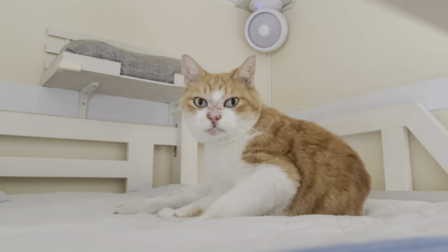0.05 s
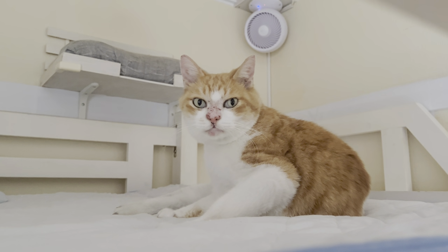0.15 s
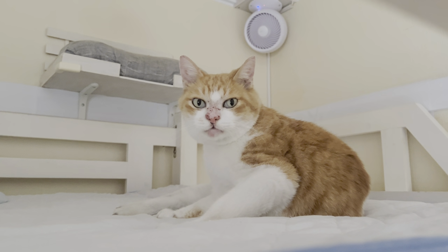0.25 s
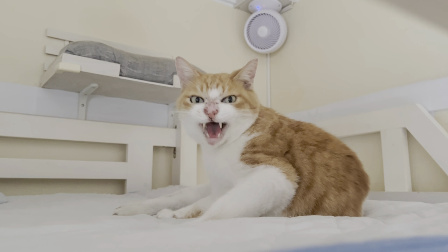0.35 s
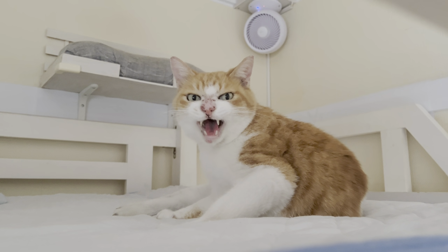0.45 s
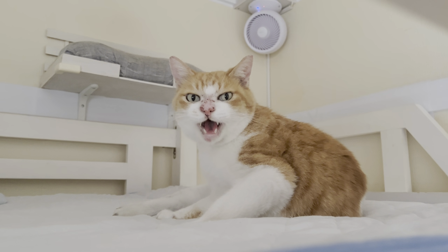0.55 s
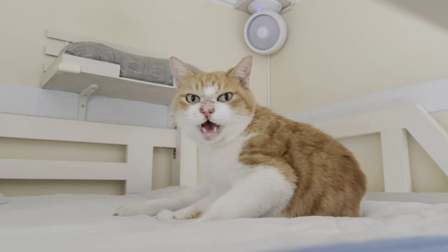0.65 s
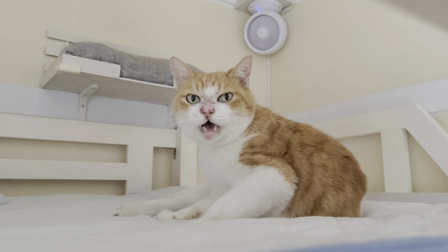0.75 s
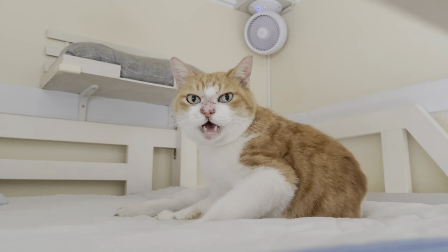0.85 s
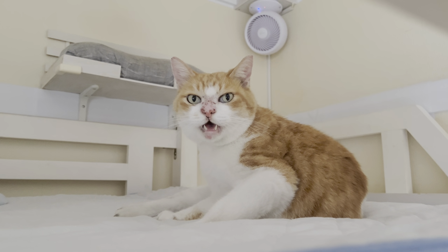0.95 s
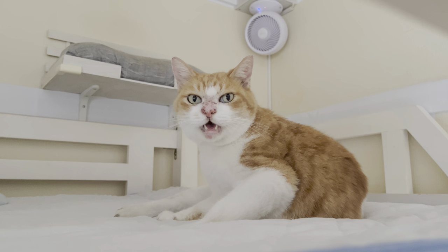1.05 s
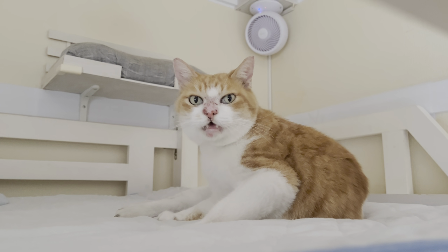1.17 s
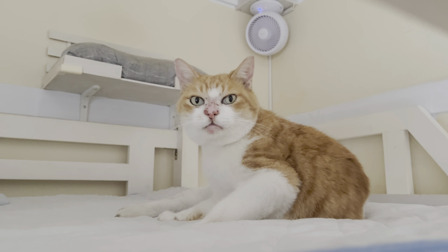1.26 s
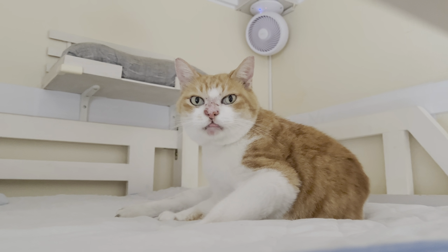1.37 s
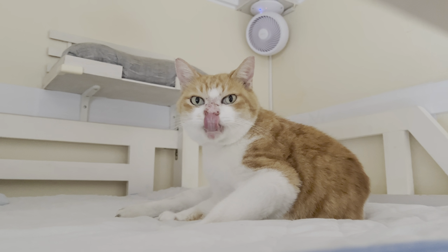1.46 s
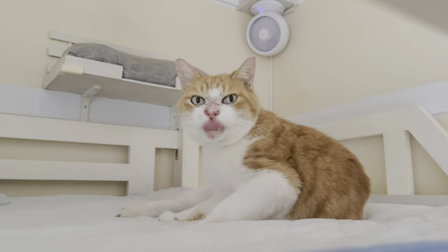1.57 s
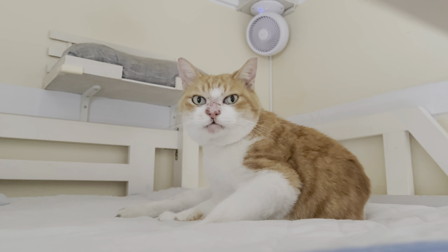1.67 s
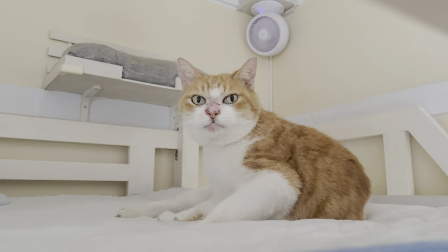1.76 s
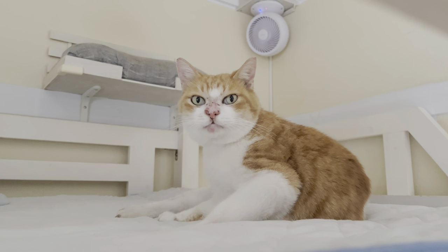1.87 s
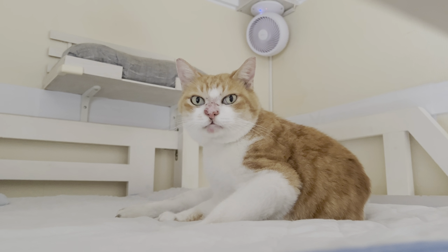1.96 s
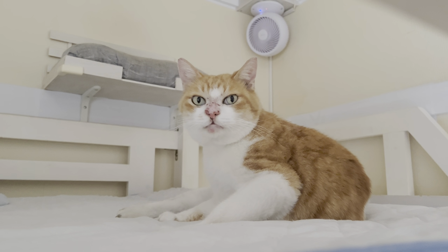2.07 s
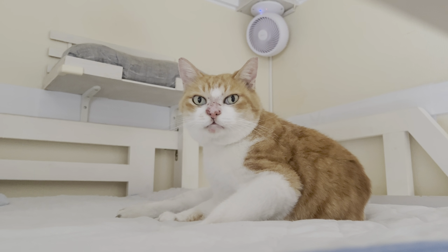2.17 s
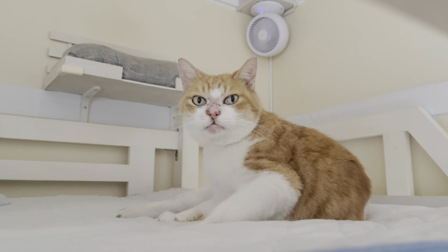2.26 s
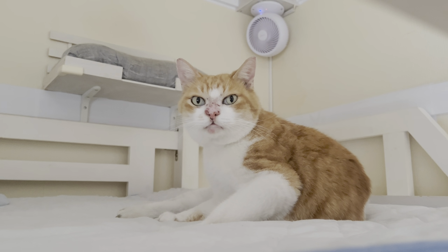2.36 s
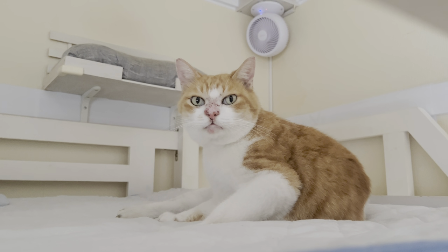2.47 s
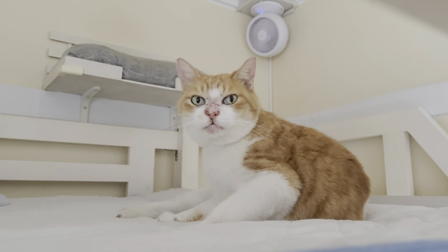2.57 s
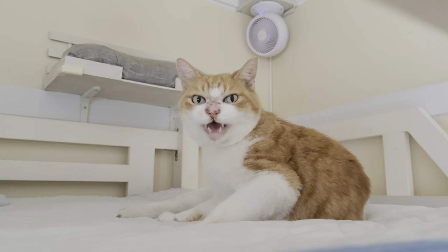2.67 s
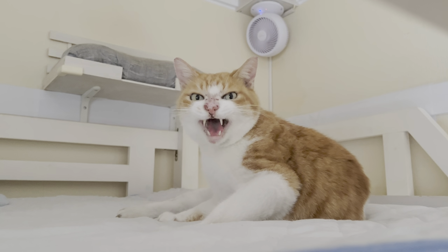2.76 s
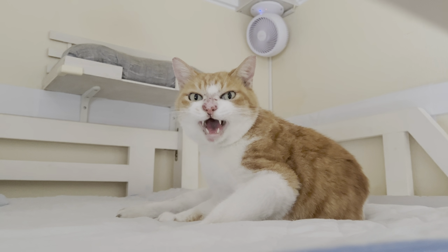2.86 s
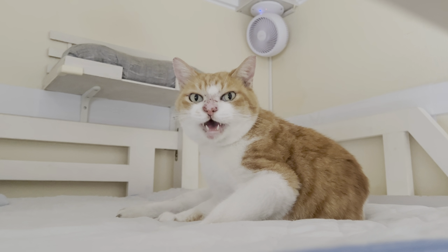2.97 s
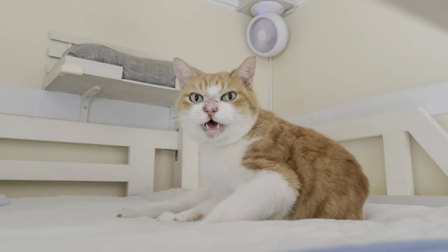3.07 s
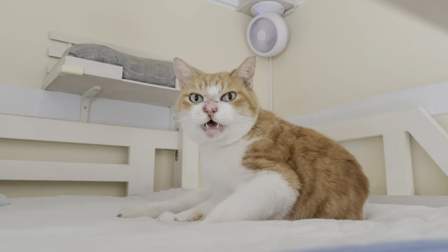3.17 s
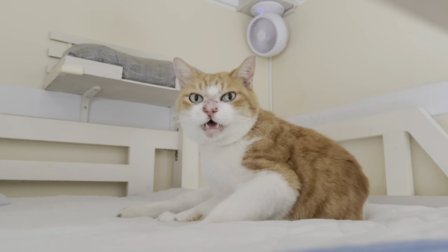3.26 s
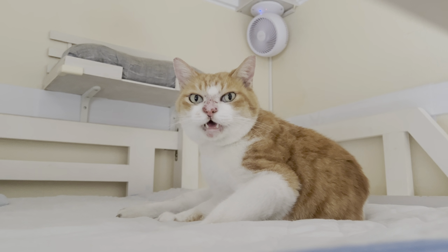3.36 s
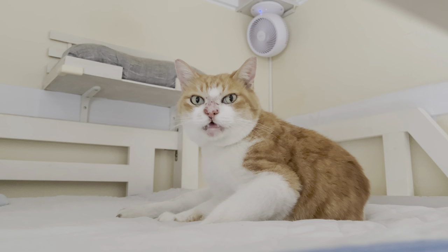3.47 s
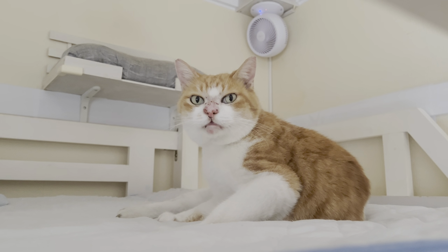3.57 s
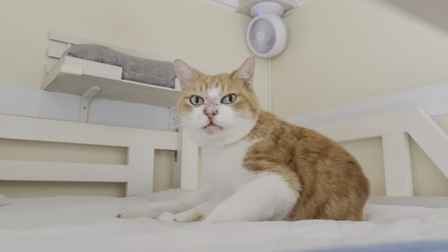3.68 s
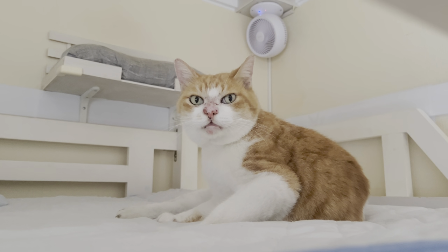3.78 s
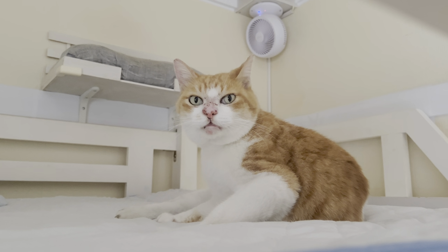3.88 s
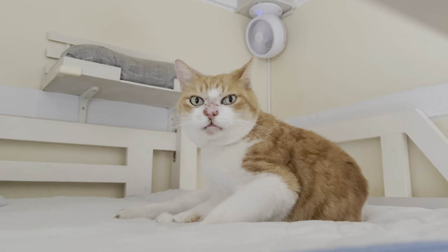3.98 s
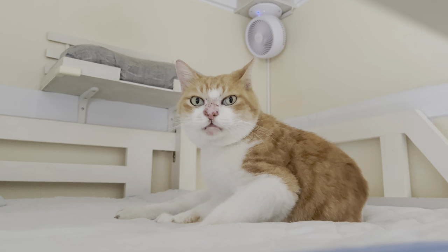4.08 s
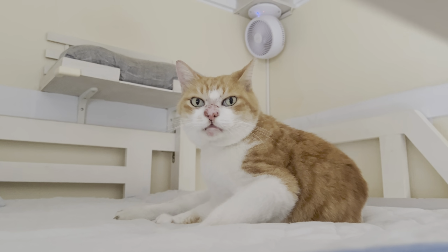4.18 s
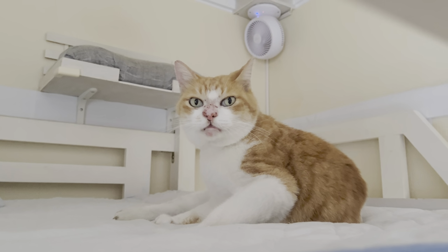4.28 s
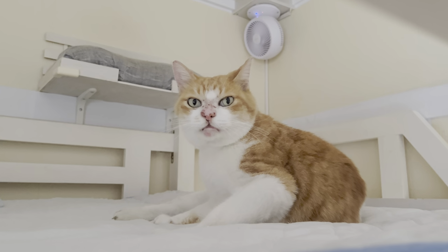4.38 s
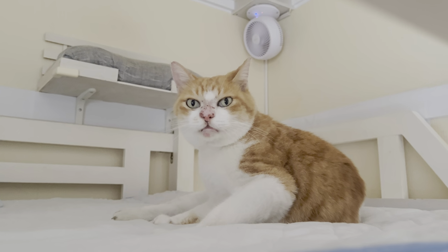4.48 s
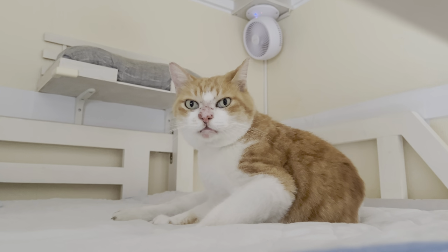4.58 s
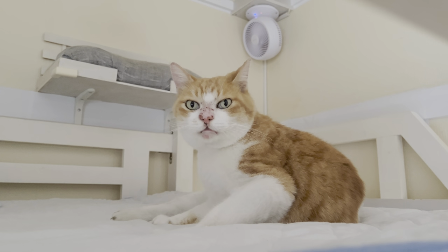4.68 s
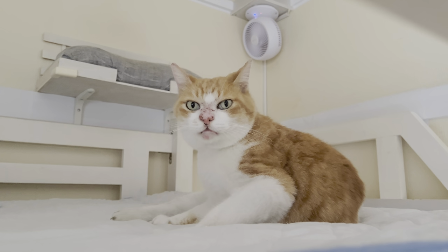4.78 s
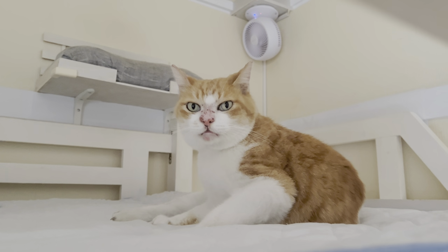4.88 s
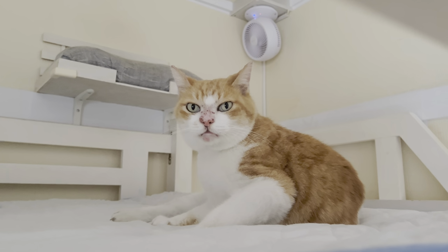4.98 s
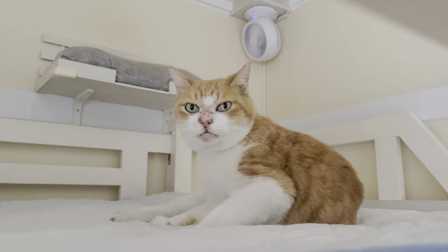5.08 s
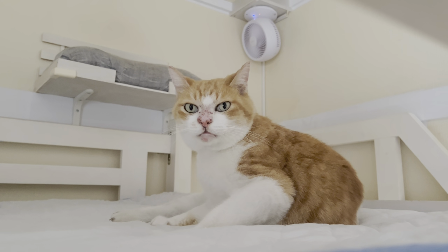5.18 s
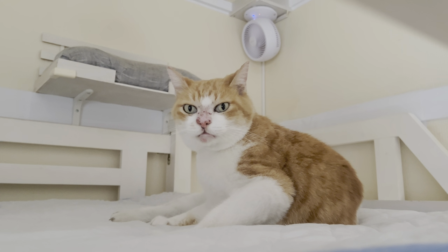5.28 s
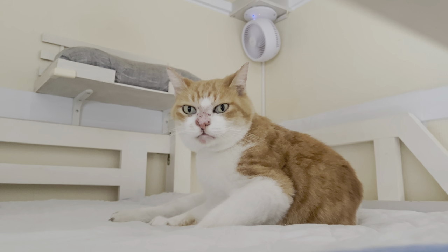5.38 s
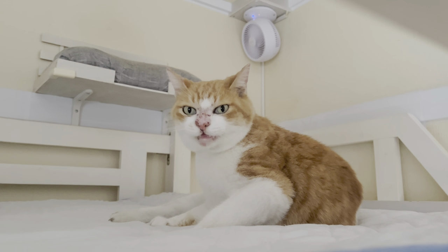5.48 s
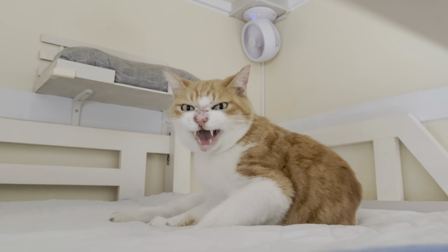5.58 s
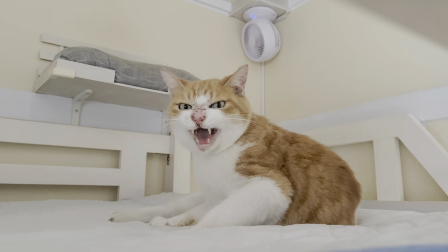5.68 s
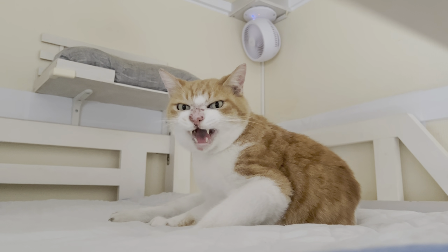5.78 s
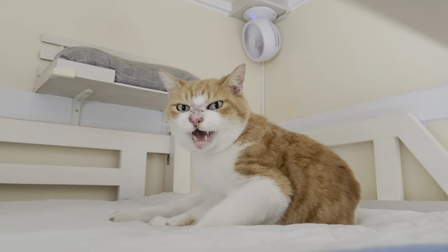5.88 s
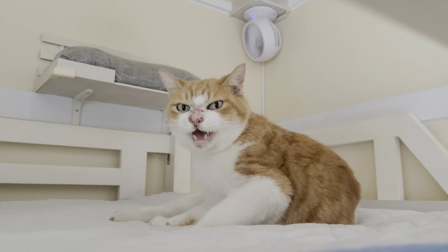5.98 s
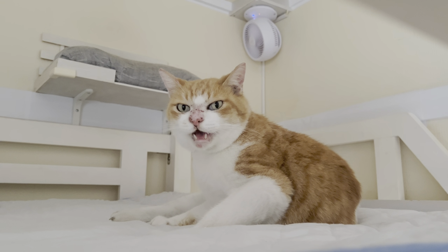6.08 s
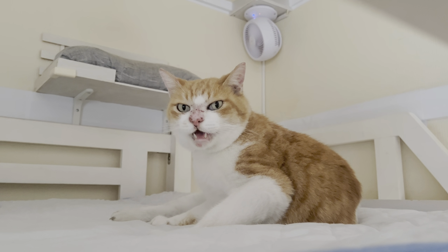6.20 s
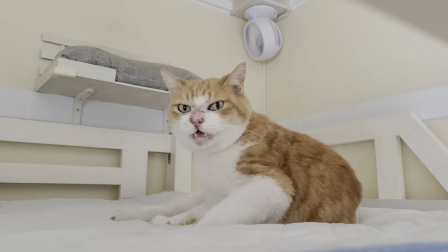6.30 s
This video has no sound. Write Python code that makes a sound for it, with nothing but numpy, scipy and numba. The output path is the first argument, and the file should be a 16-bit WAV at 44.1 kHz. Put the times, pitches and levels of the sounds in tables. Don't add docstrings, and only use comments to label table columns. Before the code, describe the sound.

Three rough, cracked cat calls, spaced about two seconds apart, close up indoors, with faint cloth rustle and a low fan whir.

```python
import sys
import numpy as np
from scipy import signal
from scipy.fft import rfft, irfft
from scipy.io import wavfile
from scipy.ndimage import uniform_filter1d
from numba import njit

SR = 44100
rng = np.random.default_rng(int(sys.argv[2]) if len(sys.argv) > 2 else 0)


def waveform_to_disk(signal):
    frames = np.transpose(np.atleast_2d(signal))
    scaled = np.clip(frames, -1, 1) * 32767
    samples = np.round(scaled).astype(np.int16)
    wavfile.write(sys.argv[1], SR, samples)


def amplitude_ratio(level_db):
    exponent = np.asarray(level_db, float) / 20
    return 10 ** exponent


N = 279622
TIME = np.arange(N) / SR
HZ = np.arange(N // 2 + 1) * SR / N

# (frequency [Hz], density [dB per Hz])
FAN_MID = [(15, -28), (25, -38), (48, -4.5), (86, -5.5), (128, 0), (152, -9), (264, -3), (300, -11),
           (333, -8.5), (363, -11), (732, -11.5), (944, -18), (1410, -23), (4000, -42), (5200, -100),
           (8800, -120)]
FAN_SIDE = [(15, -27), (25, 0), (58, -11.5), (108, -11), (264, -18.5), (300, -13.5), (333, -17.5),
            (371, -27.5), (510, -17), (831, -20.5), (1050, -29), (1610, -25.5), (2030, -35.5), (4000, -48),
            (5200, -56.5), (8800, -120)]
FAN_MID_DB, FAN_SIDE_DB = -50, -51
# (frequency [Hz], density [dB per Hz])
HISS_MID = [(2350, -32), (4000, -15), (4390, -8), (5180, 1), (5810, -0.5), (7530, -15), (9530, -25),
            (11300, -18.5), (11900, -21), (12800, -43.5), (13800, -19.5), (15100, -14), (15800, -27.5)]
HISS_SIDE = [(2350, -35.5), (4000, -19), (4240, -5), (4750, -13.5), (5610, 3), (6520, -9.5), (7480, -11.5),
             (9100, -27.5), (10300, -26), (11600, -14.5), (14200, -18.5), (15500, -17), (15800, -56)]
HISS_MID_DB, HISS_SIDE_DB = -67.5, -67.5
# (frequency [Hz], in phase [ratio], a quarter turn ahead [ratio])
PORT_SHARE = [(60, -0.21, -0.19), (130, -0.43, 0.45), (234, -0.37, 0.45), (460, -0.17, 0.72),
              (804, 0.46, 0.6), (1300, 0.27, -0.3), (1700, 0.12, 0.15), (2300, -0.42, -0.34),
              (3300, 0.0, 0.047), (4700, 0.66, 0.06), (6000, 0.16, -0.0012), (7250, 0.42, 0.073),
              (9000, -0.72, 0.01), (13000, -0.11, 0.21)]

# (time [s], level [dB])
EFFORT = [
    [(.322, -75), (.334, -42), (.362, -46.5), (.371, -38), (.43, -36), (.56, -36.5), (.85, -37.5),
     (1.06, -38.5), (1.2, -81.5)],
    [(2.69, -88), (2.702, -46), (2.77, -36.5), (2.84, -33), (2.865, -39), (3.08, -40.5), (3.335, -40.5),
     (3.365, -64), (3.46, -72)],
    [(5.478, -66), (5.534, -58), (5.564, -44), (5.61, -46), (5.638, -35), (5.86, -38.5), (6.1, -40),
     (6.2, -38.5), (6.335, -79)],
]
# (time [s], closure [-1 lips just parting, 0 wide open, 1 nearly closed, 2 shut])
JAW = [
    [(.33, -0.22), (.37, -0.12), (.43, -0.01), (.54, 0.19), (.6, 0.59), (.72, 1.06), (1.0, 1.06),
     (1.085, 1.63), (1.2, 1.68)],
    [(2.69, -0.17), (2.84, 0.069), (2.9, 0.5), (2.97, 0.84), (3.25, 0.9), (3.33, 1.66), (3.37, 1.55),
     (3.46, 1.68)],
    [(5.47, -1), (5.56, -0.47), (5.6, -0.13), (5.76, .1), (5.87, 0.4), (6.02, 0.58), (6.12, 0.79),
     (6.235, 1.565), (6.34, 1.8)],
]
# (time [s], first pitch [Hz], last pitch [Hz], roughness [0-1], weakness of every second pulse [0-1])
REGISTERS = [(.32, 955, 1010, .04, 0), (.366, 1000, 975, .45, .3), (.388, 362, 368.4, .27, 0),
             (.445, 284.3, 284.7, .4, .25), (.585, 284.7, 280, .23, .05), (.66, 279.5, 274, .31, .15),
             (.775, 280.5, 277.5, .17, 0), (.895, 272, 258, .36, .2), (1.015, 396, 384, .35, .3),
             (2.69, 160.3, 152, .58, .3), (2.805, 197.6, 199, .25, .4), (2.87, 270.8, 270.2, .55, .1),
             (2.96, 270.2, 265.3, .48, .2), (3.292, 372, 350, .28, .05), (5.47, 410, 400, .45, 0),
             (5.538, 566, 562, .14, .05), (5.576, 668, 652, .22, .25), (5.63, 652.3, 594, .17, .1),
             (5.69, 289, 273, .36, .3), (5.8, 272, 261, .19, 0), (6.02, 261.5, 250, .24, 0),
             (6.115, 422, 378, .36, .25), (6.21, 388, 362, .38, .1)]
VOICE_ENDS_S = [1.115, 3.37, 6.265]
# (time of a burst [s], rate [Hz], depth [dB], spread [s])
STUTTERS = [
    (1.048, 24.9, 2.5, .05),
    (3.342, 29, 6.5, 0.039),
    (6.2, 22, -2.5, 0.053),
]
# (closure, mouth [Hz], teeth [Hz])
TRACT = [(-1, 860, 5500), (-0.027, 2780, 5510), (0.27, 1940, 6030), (0.74, 1700, 7530), (1, 1566, 7700),
         (1.295, 1275, 7700), (1.69, 1087, 9450), (1.6, 1700, 8200)]
# (closure, chest [dB], palate [dB], teeth [dB])
BALANCE_DB = [(-1, 12, -3.5, 0), (-0.127, -4, -4.5, -9), (-0.064, -12.5, -11, -10.5),
              (0.236, -8.5, 0.5, -17.5), (1.09, -4, -7, -22.5), (1.43, -0.5, -6, -18), (1.82, 2, 2, -8),
              (1.65, -5, 6, -12)]
# (frequency [Hz], gain [dB])
BED = [(150, -3), (380, 13.5), (560, 5), (820, -3.5), (1080, -1.5), (1400, 6.5), (1700, 6.5), (1950, -3),
       (2240, 4), (2400, -5.5), (2570, -2), (3000, 1.5), (3350, -1), (4600, -2.5)]

# (time [s], peak [dB], ring [Hz], decay [ms], left minus right [dB])
TICKS = [(1.106, -53, 12000, .4, -0.5), (1.343, -55, 11500, .15, 5), (1.545, -52, 11400, .15, 2),
         (2.602, -53, 14700, 0.22, 5), (2.606, -45, 880, 11, -2), (2.627, -51, 7370, 0.87, -1),
         (2.635, -48, 7500, 0.46, -4), (2.661, -54, 2800, 0.91, 0), (2.666, -56, 3001, 0.79, 0),
         (4.578, -49.5, 1300, 4, 8), (5.014, -39.5, 65, 23, 6), (5.488, -53, 8000, 0.35, -5),
         (5.542, -47, 5530, 1.9, 9), (1.653, -43, 58, 38, -10), (.371, -48, 2900, 2, -2),
         (2.704, -35, 2740, 1.8, 0), (5.485, -44, 851, 7.8, -5.5), (2.612, -40.5, 328, 20, -1)]
# (time [s], spread [s], level [dB])
SIGHS = [
    (1.11, 0.018, -61),
    (3.363, 0.019, -60),
    (6.27, 0.036, -71),
]
# (time [s], level [dB], rise [s], fall [s])
RUSTLE = [
    (1.618, -64.5, 0.14, 0.11),
    (2.661, -55, 0.15, 0.032),
    (3.51, -54, 0.063, 0.34),
    (3.77, -68, 0.18, 0.077),
    (4.566, -60, .01, 0.2),
    (4.5, -67, 0.092, .08),
]
# (frequency [Hz], density [dB per Hz])
CLOTH = [(300, -30), (900, 3.5), (1500, 11.5), (3000, 3), (4500, 1.5), (7000, -30), (10000, -39)]

# (frequency [Hz], left minus right [dB])
LEFT_DB = [(300, 2.5), (550, -2), (800, 15.5), (1300, 10), (1700, 6.5), (2000, -5), (2600, 1), (3800, 1),
           (4800, 9.5), (6200, -7.5), (7100, 9), (9000, -12.5), (10500, 8.5)]
# (frequency [Hz], phase [radians])
LEFT_LEAD = [(0, 0), (300, .5), (800, 1.0), (1250, .6), (1700, 3.0), (2050, 4.8), (2500, 6.3), (3300, 7.0),
             (4000, 9.0), (5200, 7.3), (6300, 9.5), (7400, 7.8), (10000, 6.3), (12000, 3.2), (13700, 3.1),
             (15300, 0)]


def at_hz(table, col=1):
    t = np.array(table, float)
    return np.interp(np.log(HZ + 1), np.log(t[:, 0] + 1), t[:, col])


def at_time(table):
    s, *columns = np.transpose(table)
    return [np.interp(TIME, s, c) for c in columns]


def colour(x, table):
    return irfft(rfft(x) * amplitude_ratio(at_hz(table)), N)


def level(x, db):
    return x * amplitude_ratio(db) / np.sqrt(np.mean(x ** 2))


def bump(s, spread):
    return np.exp(-.5 * ((TIME - s) / spread) ** 2)


def walk(rate_hz):
    k = int(SR / rate_hz)
    held = np.repeat(rng.standard_normal(N // k + 1), k)
    return 1.3 * uniform_filter1d(uniform_filter1d(held, k), k)[:N]


def fan():
    share = at_hz(PORT_SHARE) + 1j * at_hz(PORT_SHARE, col=2)
    out = 0
    for mid, mid_db, side, side_db, swell_db in (
            (FAN_MID, FAN_MID_DB, FAN_SIDE, FAN_SIDE_DB, .8),
            (HISS_MID, HISS_MID_DB, HISS_SIDE, HISS_SIDE_DB, .4)):
        a, b = rfft(rng.standard_normal((2, N)))
        b = share * a + np.sqrt(np.clip(1 - abs(share) ** 2, 0, 1)) * b
        m = level(irfft(a * amplitude_ratio(at_hz(mid)), N), mid_db)
        d = level(irfft(b * amplitude_ratio(at_hz(side)), N), side_db)
        out = out + amplitude_ratio(swell_db * walk(5.02)) * np.array([m + d, m - d])
    return out


def registers():
    ragged, jump_s = .9, .008
    start, first_hz, last_hz, rough, weak = np.transpose(REGISTERS)
    marks = np.sort(np.r_[start, VOICE_ENDS_S])
    end = marks[np.searchsorted(marks, start, side="right")]
    k = np.clip(np.searchsorted(start, TIME, side="right") - 1, 0, None)
    along = np.clip((TIME - start[k]) / (end - start)[k], 0, 1)
    voiced = TIME < end[k]
    hz = first_hz[k] + along * (last_hz - first_hz)[k]
    rows = hz, np.where(voiced, rough[k], ragged), weak[k] * voiced
    return uniform_filter1d(np.array(rows), size=int(jump_s * SR), axis=1)


@njit
def folds(hz, rough, weak, chance, jitter, shimmer):
    pulses, phase, p, k = np.zeros(len(hz) + 1), np.empty(len(hz)), 0., 0
    for i in range(len(hz)):
        step = hz[i] * np.exp(jitter * rough[i] ** 2 * chance[k, 0]) / SR
        p += step
        if p >= 1:
            p, k = p - 1, k + 1
            size = np.exp(shimmer * rough[i] * chance[k, 1])
            size *= (1 - weak[i] * (k % 2)) * np.sqrt(SR / hz[i])
            pulses[i] += size * p / step
            pulses[i + 1] += size * (1 - p / step)
        phase[i] = p
    return pulses[:-1], phase


def by_jaw(table, jaw):
    closure, *columns = np.transpose(table)
    return [np.interp(jaw, closure, c) for c in columns]


@njit
def svf(x, hz, width):
    y, b, l = np.empty(len(x)), 0., 0.
    for i in range(len(x)):
        g, k = np.tan(np.pi * hz[i] / SR), width[i] / hz[i]
        v = (b + g * (x[i] - l)) / (1 + g * (g + k))
        b, l, y[i] = 2 * v - b, l + 2 * g * v, k * v
    return y


def ring(x, hz, width):
    hz, width = hz + np.zeros(N), width + np.zeros(N)
    return svf(svf(x, hz, width), hz, width) * np.sqrt(2 * SR / np.pi / width)


def cat():
    hz, rough, weak = registers()
    hz = hz * (1 + .008 * walk(40))
    pulses, phase = folds(hz, rough, weak, rng.standard_normal((N // 20, 2)), jitter=.3, shimmer=.35)
    puffs = level(np.exp(-phase / .5) * rng.standard_normal(N), 0)
    source = np.sqrt(1 - .6 * rough) * pulses + (.12 + .8 * rough) * puffs
    airy = .7 * source + .5 * puffs

    jaw, = at_time([row for call in JAW for row in call])
    mouth_hz, teeth_hz = by_jaw(TRACT, jaw)
    chest_db, palate_db, teeth_db = by_jaw(BALANCE_DB, jaw)
    closed = np.clip((teeth_hz - 5400) / 1900, 0, 1)

    mouth = ring(source, mouth_hz, 387 * mouth_hz / 1500)
    chest = amplitude_ratio(chest_db - 2.5) * ring(source, 888, 387)
    palate = amplitude_ratio(palate_db) * ring(source + .5 * rough * puffs, 2520, 437)
    teeth = ring(airy, teeth_hz, 2300 - 1750 * closed) + amplitude_ratio(-9.5) * closed * ring(airy, 8600., 1400.)
    throat = amplitude_ratio(-17) * (1 - closed) * ring(source, 1850., 800.)
    voice = mouth + chest - throat + palate + amplitude_ratio(teeth_db) * teeth
    voice = voice - np.clip(0.56 * closed, 0, 1) * svf(voice, np.full(N, 3650.), np.full(N, 1300.))
    for _ in range(2):
        voice = voice - svf(voice, np.minimum(1.7 * teeth_hz + 6000 * closed, .45 * SR), 1.44 * teeth_hz)
    voice = colour(voice, BED)

    effort_db, = at_time([row for call in EFFORT for row in call])
    for s, rate_hz, depth_db, spread in STUTTERS:
        effort_db = effort_db + depth_db * np.cos(2 * np.pi * rate_hz * (TIME - s)) * bump(s, spread)
    flutter_db = 1.4 * np.sqrt(rough) * walk(60)
    sounding = sum((TIME > call[0][0]) & (TIME < call[-1][0]) for call in EFFORT)
    gate = uniform_filter1d(1. * sounding, size=200)
    return amplitude_ratio(effort_db + flutter_db) * gate * voice


def ticks():
    out = np.zeros((2, N))
    t = np.arange(4000) / SR
    for s, peak_db, hz, ms, pan_db in TICKS:
        shape = np.exp(-t / (ms / 1000)) * np.sin(2 * np.pi * hz * t)
        i = int(s * SR)
        ports_db = peak_db + np.array([[pan_db], [-pan_db]]) / 2
        out[:, i:i + len(t)] += shape / shape.max() * amplitude_ratio(ports_db)
    return out


def sighs():
    swell = sum(amplitude_ratio(db) * bump(s, spread) for s, spread, db in SIGHS)
    return swell * ring(rng.standard_normal(N), 8500, 6600)


def rustle():
    edge_db = 20
    swell = 0
    for s, db, rise, fall in RUSTLE:
        away = np.where(TIME < s, (s - TIME) / rise, (TIME - s) / fall)
        swell = swell + amplitude_ratio(db - edge_db * away)
    slips = rng.standard_normal(N) * amplitude_ratio(3.6 * walk(300))
    return swell * level(colour(slips, CLOTH), 0)


@njit
def walls(x, lags, gain, damp):
    line, soft, out = np.zeros((8, 4096)), np.zeros(8), np.zeros((2, len(x)))
    for i in range(len(x)):
        total = 0.
        for k in range(8):
            soft[k] += (1 - damp) * (gain[k] * line[k, (i - lags[k]) & 4095] - soft[k])
            total += soft[k]
            out[k % 2, i] += soft[k]
        for k in range(8):
            line[k, i & 4095] = x[i] + 1e-18 + soft[k] - total / 4
    return out


def scene():
    t60_s, damp, room_db = .14, .3, -2.5
    near = cat() + sighs() + rustle()
    lean = amplitude_ratio(at_hz(LEFT_DB) / 2) * np.exp(.5j * at_hz(LEFT_LEAD))
    direct = irfft(rfft(near + ticks()) * np.array([lean, 1 / lean]), N)
    lags = rng.integers(300, 1500, size=8)
    room = walls(near, lags, amplitude_ratio(-60 * lags / SR / t60_s), damp)
    return direct + amplitude_ratio(room_db) * room + fan()


def low_pass(x):
    return signal.sosfilt(signal.butter(12, 16770, fs=SR, output="sos"), x)


def record(dry):
    top_hz, duck_db, duck_from_hz = 15700, -5, 8940
    spectrum = rfft(dry) * (HZ < top_hz)
    middle = irfft(spectrum.mean(axis=0) * (HZ > 1800) * (HZ < 3500), N)
    middle_rms = np.sqrt(uniform_filter1d(middle ** 2, size=2048) + 1e-18)
    loud = np.clip(middle_rms / amplitude_ratio(-42), 0, 1)
    treble = irfft(spectrum / (1 + (duck_from_hz / (HZ + 1)) ** 12), N)
    mix = irfft(spectrum, N) - treble * (1 - amplitude_ratio(duck_db * loud))
    return low_pass(mix)


dry = scene()
out = record(dry)
waveform_to_disk(out)
```